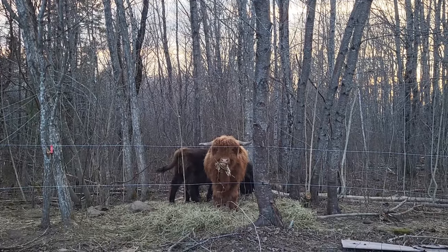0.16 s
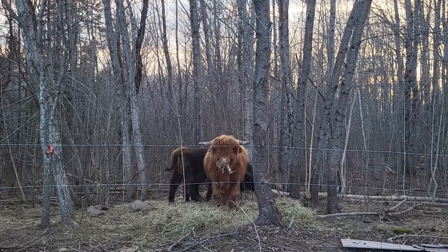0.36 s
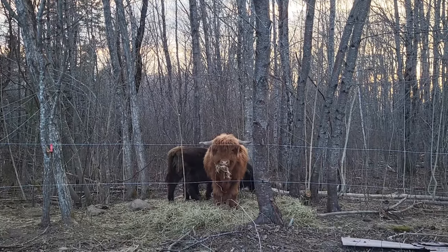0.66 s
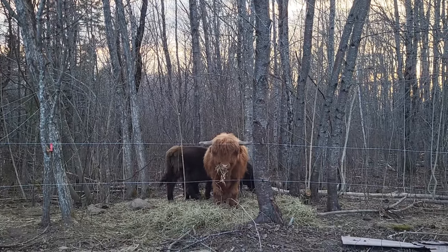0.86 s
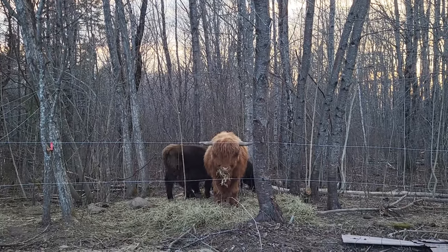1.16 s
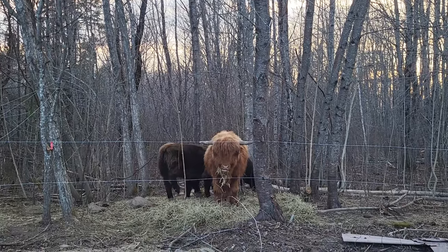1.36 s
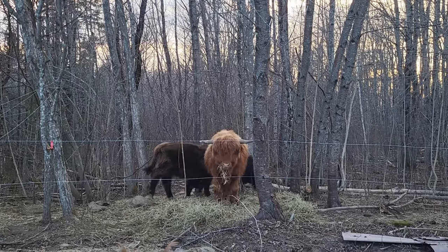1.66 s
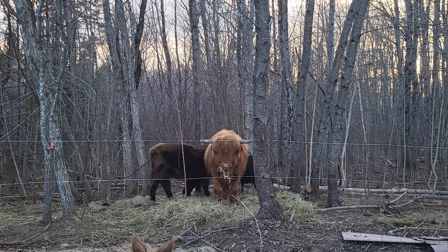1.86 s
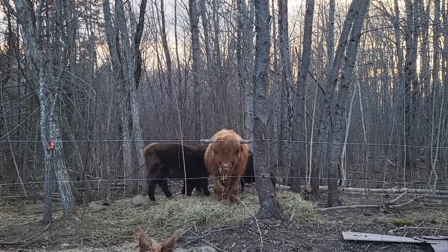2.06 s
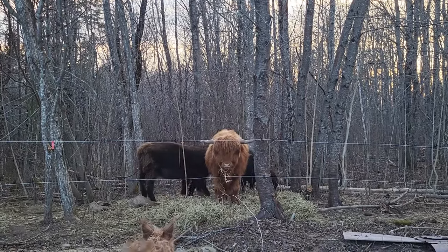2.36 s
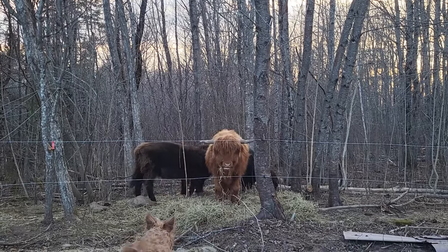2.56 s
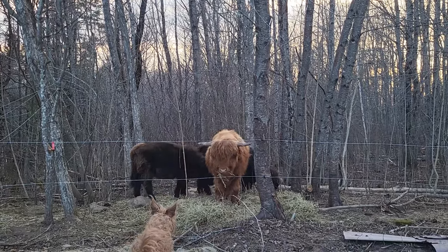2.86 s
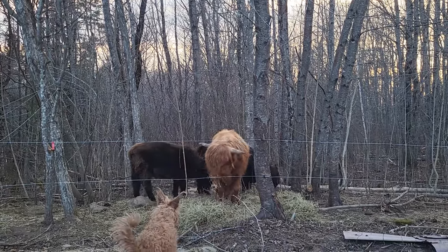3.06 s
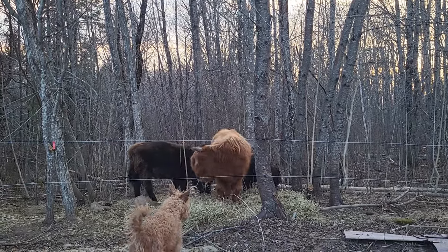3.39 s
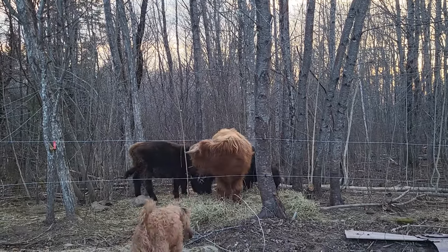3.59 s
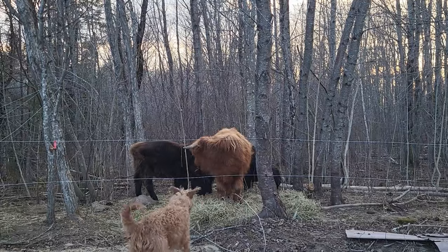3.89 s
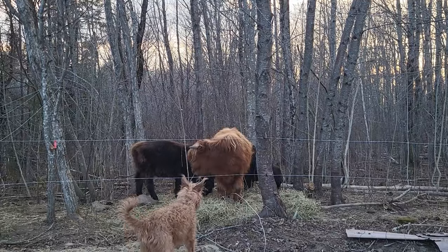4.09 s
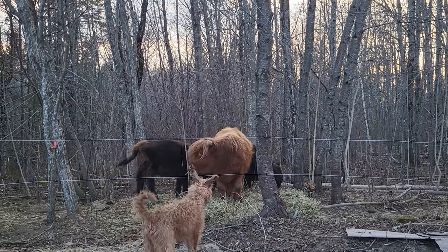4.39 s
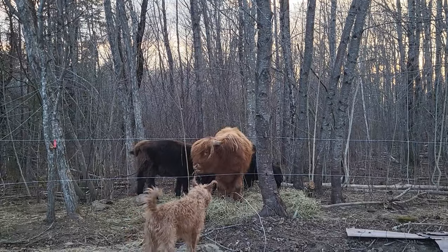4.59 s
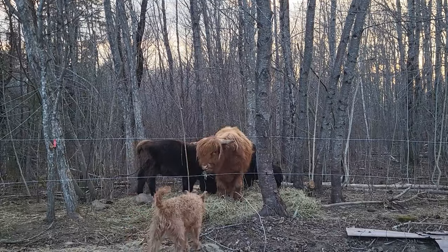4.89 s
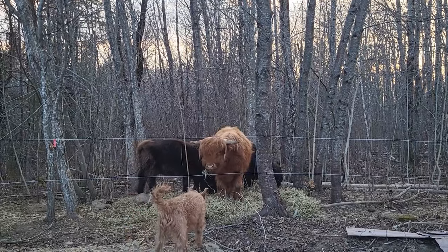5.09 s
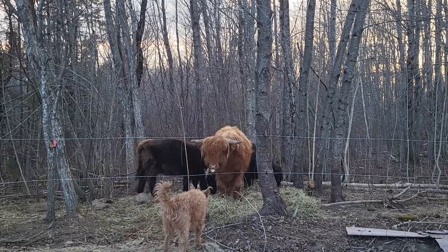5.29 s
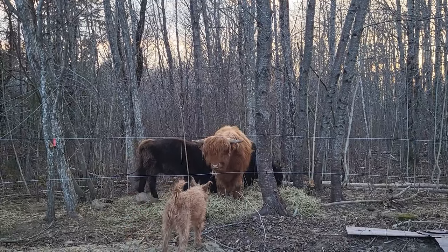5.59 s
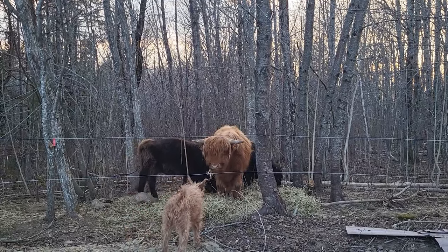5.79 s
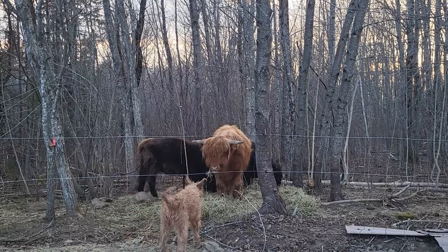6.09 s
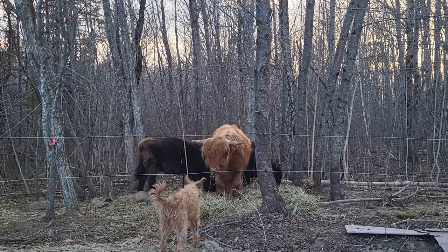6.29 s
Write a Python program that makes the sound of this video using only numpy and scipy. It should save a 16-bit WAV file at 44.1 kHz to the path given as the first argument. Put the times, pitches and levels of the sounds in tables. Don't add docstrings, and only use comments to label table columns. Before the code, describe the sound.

Outdoors at a wood's edge, heard on a hand-held phone some metres away, cattle stir dry hay with light crackling and irregular brittle snaps. Soft low hoof thuds sit underneath. A dense tearing tug bursts out past the middle, and near the end a branch cracks very loudly, pattering splinters. Faint buzzy bird phrases and short whistles come from far off, with a brief distant engine.

```python
import sys
import numpy as np
from scipy import signal
from scipy.fft import rfft, irfft, next_fast_len
from scipy.io import wavfile
from scipy.ndimage import uniform_filter1d

SR = 44100
rng = np.random.default_rng(int(sys.argv[2]) if len(sys.argv) > 2 else 0)


def invert_db(level):
    return 10 ** (np.asarray(level, dtype=float) / 20)


def generate_wav(sig):
    pcm = np.round(np.clip(np.atleast_2d(sig).T, -1, 1) * 32767).astype(np.int16)
    wavfile.write(sys.argv[1], SR, pcm)


N = 284311
SIZE = next_fast_len(N)
HZ = np.fft.rfftfreq(SIZE, 1 / SR)
T = np.arange(N) / SR
FINE_HZ = 13000
PATCHY_RUSH_DB = 2.2


def hay():
    # [t/s, level/dB]
    stir = [(0.0, -69.5), (0.45, -73.5), (1.23, -70.5), (1.56, -71), (1.82, -75), (2.2, -70.5), (2.35, -69),
            (2.56, -65.5), (2.83, -67), (3.0, -71.5), (3.6, -76.5), (4.2, -76), (4.68, -74.5), (4.89, -73),
            (5.4, -76.5), (5.9, -79), (6.447, -77.5)]
    # [t/s, level/dB]
    weight = [(0.0, -59.5), (0.57, -67), (1.02, -66.5), (1.45, -60), (1.7, -62.5), (1.85, -64.5),
              (2.08, -71.5), (2.74, -63.5), (3.299, -63), (3.551, -59.5), (3.86, -65), (4.23, -66),
              (4.681, -66), (5.56, -66.5), (5.69, -68.5), (6.44, -63)]
    # [f/Hz, level/dB per Hz]
    stalk_tone = [(880, -49.5), (1500, -24.5), (2640, -7.5), (3120, -6), (3510, -4.5), (5020, 1),
                  (7620, -2), (8860, -19), (11000, -22.5), (14300, -40), (22000, -120)]
    dust_tone = [(5290, -28.5), (9000, -21), (11100, -17), (12300, -11), (14100, -10), (15700, -10.5)]
    leaf_tone = [(150, -39.5), (250, -4), (764, -13.5), (945, -8.5), (1380, -9), (1770, -7.5), (2500, -12),
                 (3250, -13.5), (5500, -120)]
    ground_tone = [(12, -61), (20, -25.5), (40, -4.5), (70, 1), (108, -4.5), (139, -5), (296, -19),
                   (392, -26.5), (500, -26.5), (650, -31), (1100, -120)]

    stir_db = np.interp(T, *np.transpose(stir))
    weight_db = np.interp(T, *np.transpose(weight))
    usual_db = -73
    busier_db = stir_db - usual_db
    stirred_dust_db = stir_db + 5.5 + 0.18 * busier_db
    stirred_leaf_db = usual_db - 7.5 + 0.39 * busier_db
    pulled_straw = pulls(column=2)
    pulled_dust = pulled_straw * invert_db(2 * (5.5 - 3))
    stalk_db = 10 * np.log10(invert_db(2 * stir_db) + pulled_straw)
    dust_db = 10 * np.log10(invert_db(2 * stirred_dust_db) + pulled_dust)
    leaf_db = 10 * np.log10(invert_db(2 * stirred_leaf_db) + pulls(column=3))
    ground_db = 10 * np.log10(invert_db(2 * weight_db) + pulls(column=4))

    breaks = crackle(700, scatter_db=3.49, hiss=1.35) * flicker(55, db=1.9)
    straw = layer(stalk_tone, stalk_db + 4, breaks) + layer(dust_tone, dust_db, breaks)
    leaves = layer(leaf_tone, leaf_db, crackle(180, scatter_db=5, hiss=1.43))
    treading = crackle(67, scatter_db=4.18, hiss=5.7) * flicker(25, db=2.4)
    ground = layer(ground_tone, ground_db + 1.1, treading)
    return patchy(straw, db=2.1) + patchy(leaves, db=3.8) + ground


def pulls(column):
    # [t/s, held/s, straw level/dB, leaf level/dB, ground level/dB]
    rustles = [(0.0, 0.026, -65, -61.5, -64), (0.14, 0.048, -66, -69.5, -73),
               (1.296, 0.17, -77, -89, -51.5), (1.603, 0.013, -57.5, -66.5, -78),
               (1.896, 0.067, -68, -98, -94), (2.237, 0.067, -67, -67, -59.5), (2.41, 0.025, -69, -64, -67),
               (2.681, 0.026, -65, -72, -62), (2.883, 0.013, -54.5, -60, -56.5),
               (2.92, 0.0073, -59, -63.5, -53), (3.397, .1, -72, -75, -66),
               (4.032, 0.081, -63.5, -65, -50.5), (4.264, 0.013, -61.5, -95, -61),
               (4.311, 0.02, -69, -94, -70), (4.344, 0.0074, -66, -98, -73),
               (4.958, 0.033, -67.5, -68.5, -62.5), (5.06, 0.06, -71.5, -70.5, -63.5),
               (5.36, 0.17, -76.5, -69.5, -57.5), (5.75, 0.52, -96, -78, -74.5)]
    attack_s, release_db_per_s = 0.005, 293
    s, held, db = (np.array(rustles)[:, [k]] for k in (0, 1, column))
    t = T[::32]
    rise = np.clip((t - s) / attack_s + 1, 0, 1)
    released_db = release_db_per_s * np.maximum(t - s - held, 0)
    power = np.sum(rise ** 2 * invert_db(2 * (db - released_db)), axis=0)
    return np.interp(T, t, power)


def torn_mouthful():
    # [t/s, level/dB]
    tug = [
        (3.615, -81),
        (3.635, -49),
        (3.655, -33),
        (3.67, -31),
        (3.7, -34),
        (3.72, -38.5),
        (3.745, -45),
        (3.77, -59.5),
        (3.84, -66),
    ]
    # [f/Hz, level/dB per Hz]
    tug_tone = [(59, -44), (100, -4), (185, -8), (363, -19), (499, -13), (715, -31), (1240, -14.5),
                (1740, -10.5), (5230, -0.5), (7650, -8), (8680, -23), (10500, -20), (13000, -13.5),
                (15700, -16)]
    grains = crackle(1800, scatter_db=2.5, hiss=1) * flicker(150, db=0.86)
    return patchy(burst(tug, tug_tone, grains), db=PATCHY_RUSH_DB, size=256)


def snaps():
    # [t/s, peak level/dB, ring f/Hz, fine tick level/dB]
    thin_snaps = [(0.1574, -34, 5230, -31), (0.382, -46, 5100, -19), (0.5023, -66, 5690, -12),
                  (0.876, -53, 4720, -14), (0.909, -52, 4320, -25), (0.913, -46, 4330, -25),
                  (0.916, -49, 4630, -23), (1.116, -44, 4000, -22), (1.2353, -45, 5030, -26),
                  (1.549, -40.5, 4620, -16), (1.6824, -49, 4710, -13), (1.734, -46, 5100, -10),
                  (1.899, -52, 4840, -22), (1.909, -39, 5350, -17), (2.164, -48, 5500, -19),
                  (2.6903, -41.5, 5630, -7), (2.8898, -33, 6000, -7), (2.931, -38, 5040, -25),
                  (2.899, -45, 3900, -25), (2.9185, -50, 5630, -25), (3.498, -53, 5600, -22),
                  (3.657, -27, 5460, -32), (3.6678, -24, 3540, -29), (3.687, -24, 4970, -29),
                  (3.6973, -26, 5320, -29), (0.534, -45.5, 4100, -32), (0.7, -47, 3800, -30),
                  (2.416, -42.5, 4120, -22), (5.268, -55, 4920, -28.5), (3.8265, -42, 5070, -12),
                  (4.129, -45, 5170, -22), (4.266, -49, 5160, -10), (4.516, -44.5, 5400, -17),
                  (5.8487, -49, 4900, -11)]
    # [t/s, peak level/dB, ring f/Hz, low knock level/dB, left minus right/dB]
    thick_snaps = [(0.0845, -36, 2370, -25, -3), (0.088, -38, 3200, -25, 2), (0.09, -36, 2180, -33, 3),
                   (0.11, -43, 2160, -30, -4), (0.2663, -44.5, 5300, -9.5, 4), (0.39, -56, 4800, 3, -9),
                   (0.396, -37, 5250, -9, 1), (0.6136, -37.5, 1900, -30, -1),
                   (1.0309, -36.5, 5130, -9.5, -3), (1.322, -39.5, 5270, -16, 15),
                   (1.411, -67, 4710, 12, 3), (1.421, -64, 4700, 16, 3), (2.413, -38.5, 4900, -12.5, 2),
                   (2.423, -44, 3560, -9, 6), (3.732, -22.5, 2070, -47, 0), (4.0298, -34.5, 4350, -32, 10),
                   (4.3251, -63, 2920, -34, -4), (4.918, -44, 4460, -15, -1), (5.073, -41, 4850, -36, 4),
                   (5.267, -44, 3040, -40, -6), (5.3775, -38, 2950, -28.5, -3),
                   (6.148, -49, 1610, -21.5, 9)]
    # [t/s, peak
    # level/dB, ring f/Hz, left minus right/dB]
    clicks = [(0.1572, -36, 5400, -3), (0.309, -47, 5200, -2), (0.3815, -44, 7400, 0),
              (0.3967, -42, 9800, 0), (0.6128, -43, 4800, -3), (0.7656, -26, 4200, -4),
              (1.0095, -48, 5300, -3), (1.058, -45, 7200, 0), (1.062, -48, 4600, -2),
              (1.0981, -36, 7500, 0), (1.122, -50, 3400, 0), (1.1308, -38, 5700, -2), (1.176, -45, 7000, 0),
              (1.1998, -40, 5700, -2), (1.5492, -41, 4200, -2), (1.5498, -42, 9500, 0),
              (1.6047, -36, 5200, -2), (1.6092, -39, 6200, 0), (1.6145, -45, 4600, 0),
              (1.6232, -35, 5800, -2), (1.6249, -36, 4300, 0), (1.6262, -39, 5400, 0),
              (1.672, -45, 4800, -2), (1.6835, -44, 9500, 0), (1.7065, -45, 4800, -2),
              (1.7185, -44, 5400, -2), (1.7235, -44, 7200, 0), (1.7335, -41, 10300, 0),
              (1.8972, -38, 5100, -2), (2.0928, -49, 5300, -2), (2.1202, -47, 6500, 0),
              (2.3414, -35, 4700, -3), (2.4135, -39, 7600, 0), (2.4238, -38, 4900, -2),
              (3.654, -26, 5400, -2), (3.6802, -20.5, 5000, -2), (3.826, -40, 5000, -2),
              (4.7605, -50, 4300, -3), (4.8575, -49, 4900, -2), (4.9268, -47, 4600, -2),
              (5.0988, -44, 4900, -3), (5.3458, -37, 2900, -2), (5.4945, -13, 4600, -2)]
    # [t/s, peak level/dB]
    ticks = [(0.3645, -45), (0.398, -41), (0.581, -45), (1.5495, -39), (1.6235, -38), (1.684, -45),
             (1.7335, -45), (2.2392, -43), (2.2665, -42), (2.3412, -40), (2.4135, -43), (2.86, -40),
             (2.8912, -19), (2.923, -36), (3.14, -44), (3.361, -46), (3.4395, -43)]

    # s, peak dB, ring Hz, low knock dB, fine tick dB, left minus right dB
    stalks = [(s, db + 4.5, hz, -39, fine_db, -4) for s, db, hz, fine_db in thin_snaps]
    stalks += [(s, db, hz, low_db, -33.5, pan_db) for s, db, hz, low_db, pan_db in thick_snaps]
    out = np.zeros((2, N))
    fibres = rng.standard_normal((len(stalks), 8192))
    for (s, db, hz, low_db, fine_db, pan_db), noise in zip(stalks, fibres):
        fibre_band = signal.butter(3, [0.81 * hz, 1.69 * hz], "band", fs=SR)
        tear = signal.lfilter(*fibre_band, noise * np.exp(-T[:8192] / 0.0011))
        hollow = 3.18 * ring(hz, 4.2 / hz, soft=0.8)
        knock = ring(860, 0.012, soft=0.29) + 0.99 * ring(600, 0.014, soft=0.39)
        tick = ring(FINE_HZ, 0.0028)
        snap = hollow + tear + invert_db(low_db) * knock + invert_db(fine_db) * tick
        add(out, s, invert_db(db - 1) * snap * pan(pan_db)[:, None])
    for s, db, hz, pan_db in clicks:
        click = ring(hz, 3.4 / hz, soft=0.75)
        add(out, s, invert_db(db + 10.5) * click * pan(pan_db)[:, None])
    for s, db in ticks:
        add(out, s, invert_db(db) * ring(FINE_HZ, 0.0016) * np.ones((2, 1)))
    return np.array([ports(out[0])[0], ports(out[1])[1]])


def hooves():
    # [t/s, peak level/dB, ground f/Hz, litter level/dB]
    steps = [(0.266, -57, 65, -11), (1.254, -46, 70, -17), (1.306, -42.5, 88.5, -6.5),
             (1.418, -50.5, 54, 9.5), (1.433, -41.5, 82.5, -21), (2.673, -45.5, 85, -10.5),
             (2.895, -33.5, 100, -28), (2.908, -34.5, 78.6, -44), (3.477, -42, 64.7, -35),
             (3.711, -37.5, 168, -5.5), (4.088, -46, 67, -24), (4.609, -67, 98, -25),
             (5.098, -51, 76.5, -13)]
    # [t/s, peak level/dB, ground f/Hz, knock f/Hz, knock level/dB]
    knocks = [(0.085, -67, 139, 2230, 22.5), (0.079, -45.5, 135, 201, 1.5), (1.325, -43, 70.5, 295, -2.5),
              (2.247, -68.5, 78.6, 290, 13), (2.597, -47.5, 127, 280, -4.5), (1.318, -58, 72, 960, 0),
              (1.4118, -43, 150, 890, -10), (1.4165, -52, 120, 1190, -2), (1.431, -61, 140, 970, 2),
              (3.274, -57, 124, 243, 4), (3.689, -33.5, 197.5, 536, -4), (4.032, -40.5, 228, 428, 5),
              (4.045, -47, 67.3, 257, 9), (4.0284, -56.5, 200, 1210, 4.5), (4.061, -51, 60, 447, 1),
              (4.092, -54, 74, 416, -5), (4.109, -50.5, 117, 241, 2.5), (5.465, -35.5, 202, 390, 11),
              (5.469, -30, 135, 343, -1), (5.529, -27.5, 78, 393, -10), (6.15, -43, 101.7, 366, -16.5)]

    # s, peak dB, ground Hz, knock Hz, knock dB, litter dB
    thuds = [(s, db, hz, 206, litter_db + 1, litter_db) for s, db, hz, litter_db in steps]
    thuds += [(*row, row[-1] - 8) for row in knocks]
    out = np.zeros(N)
    litter_band = signal.butter(4, [230, 1000], "band", fs=SR)
    litter = signal.lfilter(*litter_band, rng.standard_normal((len(thuds), 8192)))
    for (s, db, ground_hz, knock_hz, knock_db, litter_db), crush in zip(thuds, litter):
        thud = ring(ground_hz, 0.079) - invert_db(knock_db) * ring(knock_hz, 0.039, soft=0.054)
        crushed = invert_db(litter_db) * crush * np.exp(-T[:8192] / 0.033)
        add(out, s, invert_db(db) * (thud + crushed))
    return ports(out)


def branch():
    # [t/s, peak level/dB, wood level/dB]
    cracks = [
        (5.4945, -17, -23),
        (5.4962, -21, -18),
        (5.4982, -13, -1),
        (5.5001, -22, 4.5),
        (5.5046, -23, 4),
        (5.5072, -26.5, 2.5),
        (5.5112, -28, 0.5),
        (5.516, -32.5, 0.5),
        (5.522, -30.5, -22),
        (5.5453, -27.5, -27),
    ]
    # [f/Hz, level/dB, t60/s]
    wood_modes = [(280, 4.5, 0.04), (415, -4, 0.1), (395, 0, 0.12), (480.6, -4.5, 0.045), (724, 1.5, 0.04),
                  (816, 1, 0.03), (1036, 4, 0.034), (1250, 6.5, 0.0203)]
    # [t/s, level/dB]
    splinters = [
        (5.4905, -38),
        (5.494, -32),
        (5.4965, -22.5),
        (5.51, -29),
        (5.55, -34),
        (5.65, -49),
        (5.75, -64),
        (5.9, -76.5),
    ]
    # [f/Hz, level/dB per Hz]
    splinter_tone = [(59, -50), (100, -7.5), (185, -18.5), (442, -16.5), (558, -18.5), (1010, -12),
                     (1300, -19.5), (1650, -12.5), (3900, -16.5), (5190, -14.5), (7450, -21.5), (8830, -34),
                     (12400, -27.5), (16000, -33)]

    wood = sum((-1) ** k * invert_db(db) * ring(hz, t60) for k, (hz, db, t60) in enumerate(wood_modes))
    wood = wood / np.abs(wood).max()
    fibre = ring(3850, 0.0021, soft=0.34) + 0.64 * ring(6200, 0.0024, soft=0.44)
    out = np.zeros(N)
    for s, db, wood_db in cracks:
        add(out, s, invert_db(db) * (fibre + invert_db(wood_db) * wood))
    patter = burst(splinters, splinter_tone, crackle(1100, scatter_db=5.6, hiss=1.5))
    return ports(out) + patchy(patter, db=PATCHY_RUSH_DB, size=256)


def buzzy_bird():
    # [t/s, f/Hz, level/dB]
    arcs = [
        [(0.0, 2840, -74), (.1, 2875, -71), (.2, 3000, -78), (.3, 3070, -84)],
        [(.33, 2760, -76), (.45, 2930, -79), (.54, 2980, -75), (.59, 3060, -63.5), (.67, 3200, -68.5),
         (.72, 3103, -74), (.84, 3236, -84)],
        [(2.24, 2720, -78), (2.33, 2870, -69.5), (2.42, 2920, -76)],
        [(2.425, 3000, -71), (2.47, 3096, -67), (2.53, 3140, -67.5), (2.6, 3160, -77), (2.76, 3220, -79)],
        [(2.89, 2714, -75), (3.0, 2810, -70.5), (3.1, 2930, -74), (3.21, 3020, -77)],
        [(4.09, 2640, -69), (4.15, 2790, -78.5), (4.3, 2860, -73), (4.4, 3000, -69), (4.51, 3220, -67),
         (4.55, 3130, -74), (4.69, 3240, -81)],
        [(4.88, 2765, -81), (5.1, 2780, -82.5), (5.18, 2910, -71), (5.27, 2980, -76), (5.33, 3040, -78),
         (5.41, 3040, -80)],
        [(6.04, 2740, -83), (6.11, 2850, -75.5), (6.16, 2880, -73), (6.26, 2856, -85.5)],
        [(6.29, 2980, -78), (6.34, 3064, -71.5), (6.44, 3240, -65.5)],
    ]
    # [loudest t/s, f/Hz there, climb/Hz per s, level/dB, lead-in/s]
    phrases = [
        (1.849, 2490, 302, -85.5, 0.078),
        (2.021, 2553, 605, -84.5, 0.11),
        (3.39, 3260, 900, -78, .05),
        (4.55, 2126, 300, -83, .1),
        (5.95, 3100, 100.3, -80, 0.032),
        (6.359, 2750, 101, -75.5, .05),
        (6.431, 2880, 101, -71.5, 0.036),
    ]
    notes = arcs + [phrase(*row) for row in phrases]
    return ports(invert_db(2.5) * song(notes, buzz_hz=52, clear=0.5))


def phrase(s, hz, climb, db, lead):
    swell_db_per_s, fade_db_per_s, fade_s, climb_ease = 60, 120, 0.13, 0.5
    start = (max(s - lead, 0), hz - climb * lead, db - swell_db_per_s * lead)
    end = (s + fade_s, hz + climb_ease * climb * fade_s, db - fade_db_per_s * fade_s)
    return [start, (s, hz, db), end]


def whistling_bird():
    # [t/s, length/s, from f/Hz, to f/Hz, level/dB]
    slurs = [
        (2.73, .05, 2200, 2130, -87),
        (2.795, 0.055, 2850, 2880, -77),
        (3.25, 0.055, 3270, 3160, -79),
        (3.322, .075, 2950, 2440, -81),
        (3.38, .04, 2300, 2130, -87),
        (3.84, 0.07, 3380, 3360, -82),
        (3.92, .11, 3050, 2670, -78),
        (4.395, 0.06, 2800, 2120, -86),
        (4.63, 0.075, 2850, 2480, -83),
        (6.39, 0.034, 2210, 2900, -76),
    ]
    return ports(song([slur(*row) for row in slurs], buzz_hz=30, clear=3.4))


def slur(s, length, from_hz, to_hz, db):
    midway_hz = from_hz + 0.74 * (to_hz - from_hz)
    return [(s, from_hz, db - 7), (s + length / 2, midway_hz, db), (s + length, to_hz, db)]


def song(notes, buzz_hz, clear):
    out = np.zeros(N)
    buzz_band = signal.butter(2, buzz_hz, fs=SR)
    for note in notes:
        s, hz, db = np.transpose(note)
        t = np.arange(s[0], s[-1], 1 / SR)
        shake = signal.lfilter(*buzz_band, [1, 1j] @ rng.standard_normal((2, SR)))
        shake = shake[-len(t):] / shake.std()
        tone = np.exp(2j * np.pi * np.cumsum(np.interp(t, s, hz)) / SR)
        edges = np.minimum(1, np.minimum(t - s[0], s[-1] - t) / 0.014)
        add(out, s[0], edges * invert_db(np.interp(t, s, db)) * (tone * (clear + shake)).real)
    return out


def drone():
    # [t/s, level/dB]
    engine = [
        (2.5, -100),
        (2.65, -78),
        (3.1, -72.5),
        (3.45, -80),
        (3.6, -100),
    ]
    band = signal.butter(2, [930, 1230], "band", fs=SR)
    hum = signal.lfilter(*band, rng.standard_normal((2, N)))
    return hum / hum.std() * invert_db(np.interp(T, *np.transpose(engine)))


def trunks(x, t60):
    t = T[:SR]
    noise = rng.standard_normal((2, 2, SR))
    middle = signal.butter(2, [1600, 4600], "band", fs=SR)
    far = signal.lfilter(*middle, noise[0]) * np.exp(-np.log(1000) * t / t60)
    close = 1.44 * noise[1] * np.exp(-np.log(1000) * t / (0.22 * t60))
    tail = (far + close) * (t > 0.008)
    tail = tail / np.sqrt(np.sum(tail ** 2, axis=1, keepdims=True))
    return signal.fftconvolve(x, tail, axes=1)[:, :N]


def crackle(rate, scatter_db, hiss):
    hit = rng.random((3, N)) < rate / SR
    sizes = invert_db(scatter_db * np.minimum(rng.exponential(size=(3, N)), 2.6))
    grains = hit * sizes * rng.standard_normal((3, N))
    return grains / grains.std() + hiss * rng.standard_normal((3, N))


def flicker(rate, db):
    k = int(SR / rate)
    held = np.repeat(rng.standard_normal(N // k + 1), k)
    return invert_db(db * uniform_filter1d(held, k)[:N])


def patchy(x, db, size=1024):
    spread = signal.stft(x, nperseg=size)[2]
    field = rng.standard_normal(spread.shape[1:])
    field = uniform_filter1d(field, size=9, axis=0)
    field = uniform_filter1d(field, size=7, axis=1)
    return signal.istft(spread * invert_db(db * field / field.std()), nperseg=size)[1][:, :N]


def burst(curve, tone, grains):
    return layer(tone, np.interp(T, *np.transpose(curve), left=-150, right=-150), grains)


def layer(tone, db, grains):
    # [f/Hz, share]
    alike = [(60, 0.96), (300, 0.8), (1000, 0.2), (3000, 0.043), (8000, 0.15), (15000, 0.15)]
    near, *far = (colour(x, tone) for x in grains)
    return ports(near, np.array(far), np.clip(along(alike), 0, 1)) * invert_db(db)


def ring(hz, t60, soft=0):
    t = T[:8192]
    build_up = 1 - np.exp(-(t * hz / (soft + 1e-9)) ** 2)
    return np.sin(2 * np.pi * hz * t) * np.exp(-np.log(1000) * t / t60) * build_up


def along(table):
    hz, value = np.transpose(table)
    return np.interp(np.log(HZ + 1), np.log(hz + 1), value)


def colour(x, tone):
    y = irfft(rfft(x, SIZE) * invert_db(along(tone)), SIZE)[:N]
    return y / np.sqrt(np.mean(y ** 2))


def ports(near, scattered=0, alike=1.0):
    # [f/Hz, left lead/rad]
    port_lead = [(1, 0), (500, -.1), (1030, -.5), (2240, .3), (3200, .7), (4000, 1.8), (5340, 2.4),
                 (7500, 2), (9390, 3), (11300, 2.3), (12700, 5.7), (16000, 6.3)]
    # [f/Hz, left minus right/dB]
    port_db = [(60, 5), (110, 4), (200, 3), (380, 3), (700, 2), (1290, 4.5), (2380, 0.5), (3100, -7),
               (4400, -14), (6200, -5.5), (8120, 3), (15000, -2)]
    gap = invert_db(along(port_db) / 2) * np.exp(0.5j * along(port_lead))
    common = np.sqrt(alike) * rfft(near, SIZE)
    own = np.sqrt(1 - alike) * rfft(scattered + np.zeros((2, N)), SIZE)
    return irfft((common + own) * np.array([gap, 1 / gap]), SIZE)[:, :N]


def pan(db):
    return invert_db(np.array([db, -db]) / 2)


def add(out, s, sound):
    i = int(s * SR)
    out[..., i:i + sound.shape[-1]] += sound[..., :N - i]


def scene():
    hits = snaps() + pan(-0.47)[:, None] * (hooves() + branch())
    buzzes, whistles = buzzy_bird(), whistling_bird()
    echoes = invert_db(-16) * hits + invert_db(-5) * buzzes + invert_db(-8) * whistles
    return hay() + torn_mouthful() + hits + buzzes + whistles + drone() + trunks(echoes, t60=0.87)


def band_limit(x):
    return signal.sosfilt(signal.butter(12, 16490, fs=SR, output="sos"), x)


def record(dry):
    bass_cut = signal.butter(4, 42, "high", fs=SR, output="sos")
    top_cut = signal.ellip(10, 0.3, 60, 15700, fs=SR, output="sos")
    mix = signal.sosfilt(top_cut, signal.sosfilt(bass_cut, dry))
    return band_limit(mix)


dry = scene()
out = record(dry)
generate_wav(out)
```